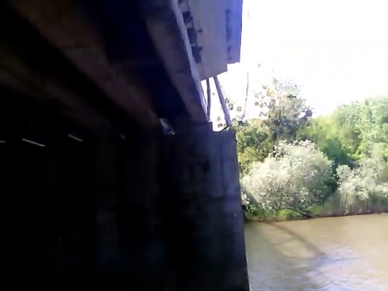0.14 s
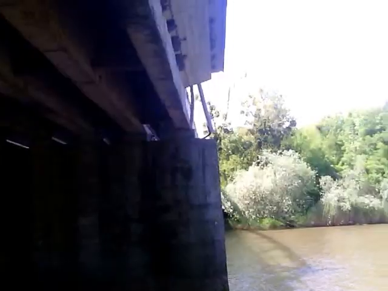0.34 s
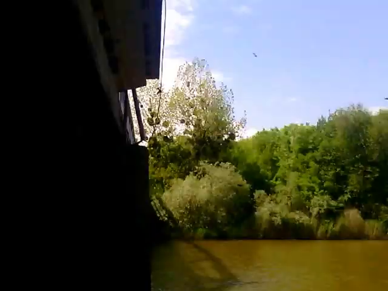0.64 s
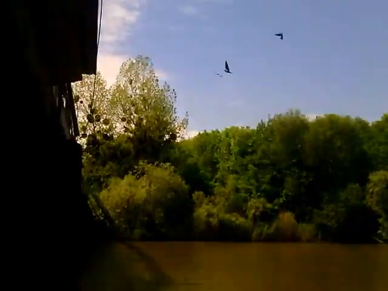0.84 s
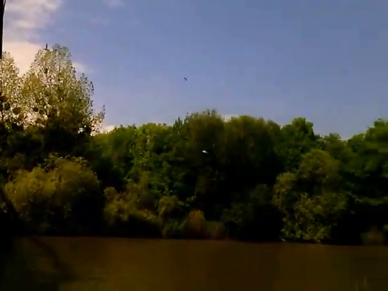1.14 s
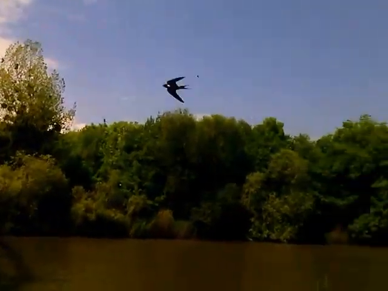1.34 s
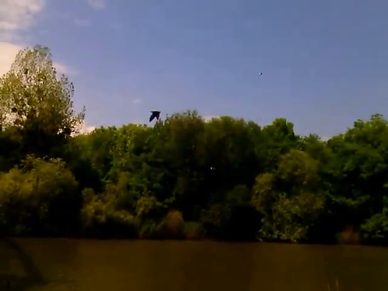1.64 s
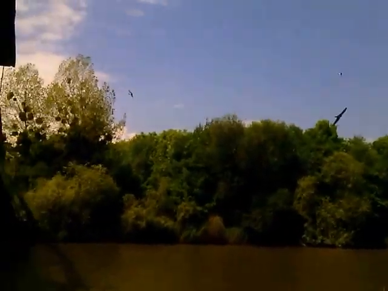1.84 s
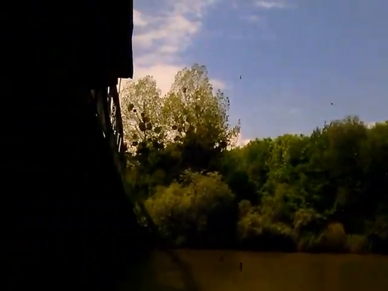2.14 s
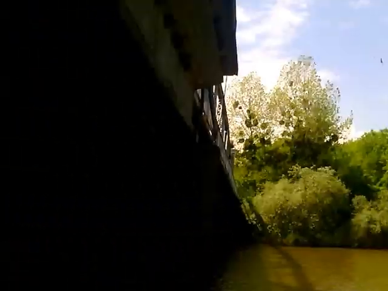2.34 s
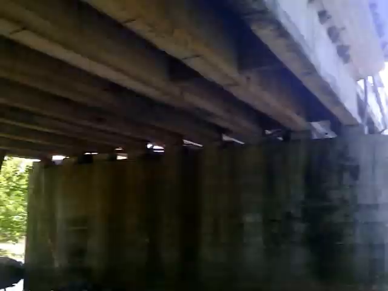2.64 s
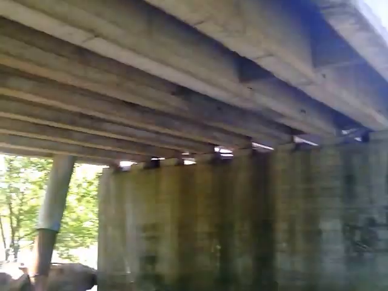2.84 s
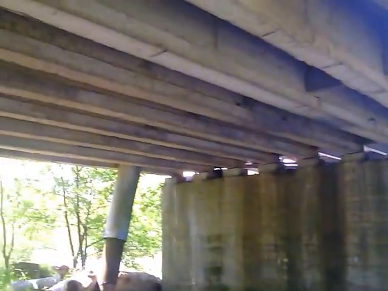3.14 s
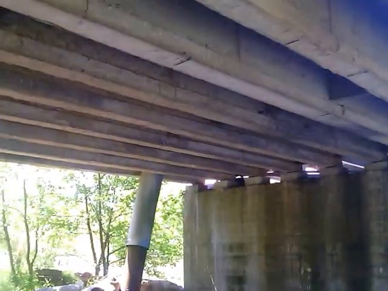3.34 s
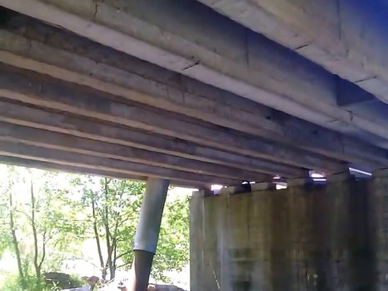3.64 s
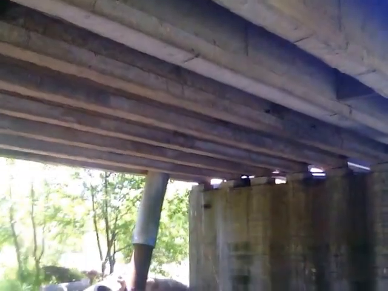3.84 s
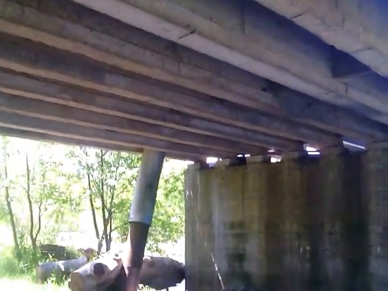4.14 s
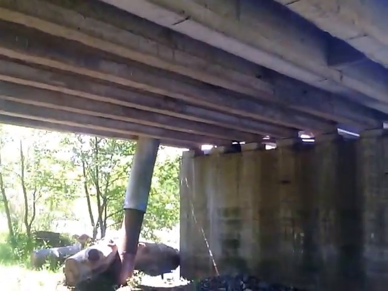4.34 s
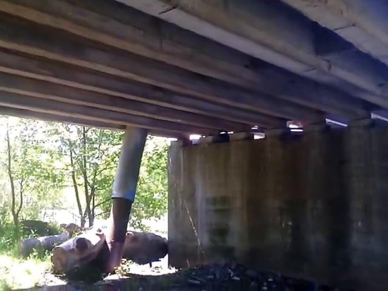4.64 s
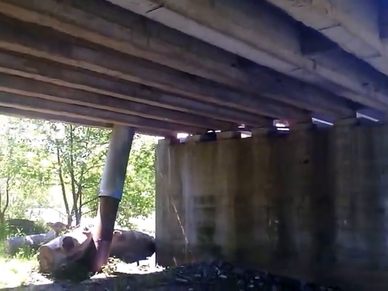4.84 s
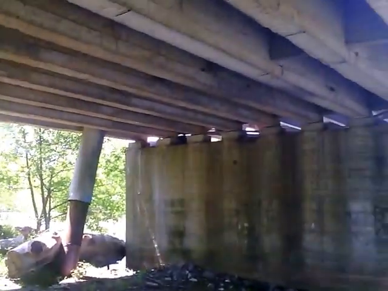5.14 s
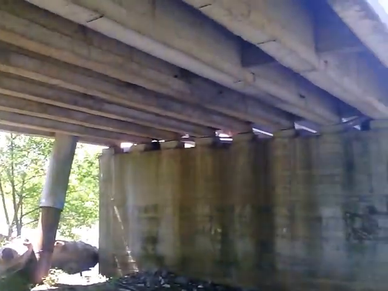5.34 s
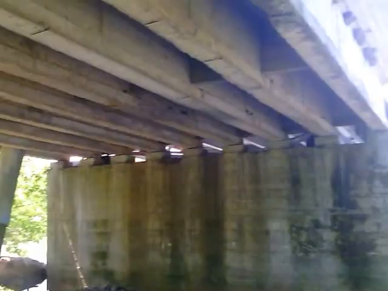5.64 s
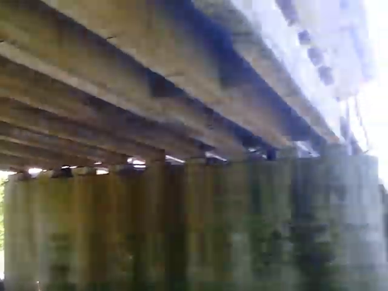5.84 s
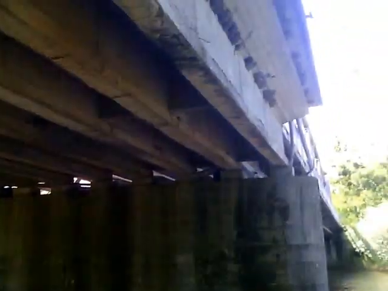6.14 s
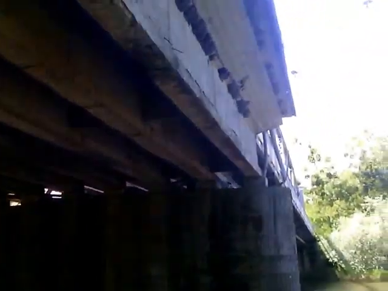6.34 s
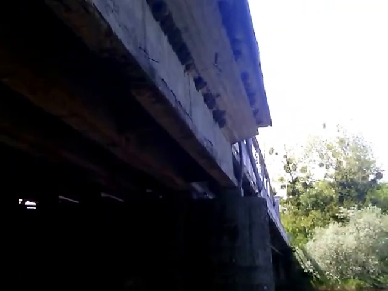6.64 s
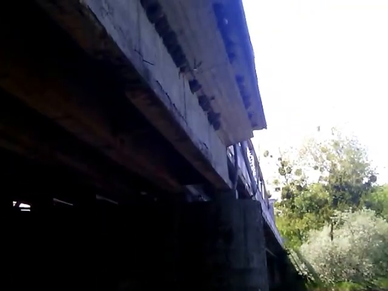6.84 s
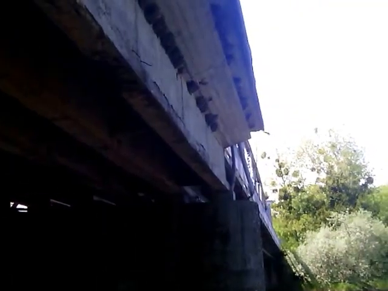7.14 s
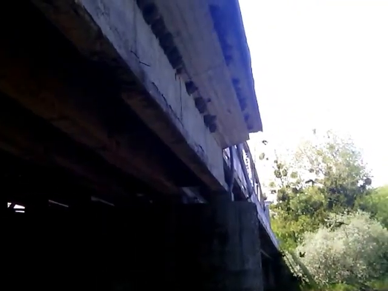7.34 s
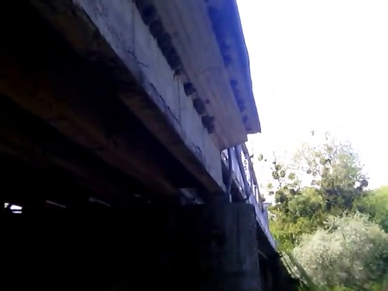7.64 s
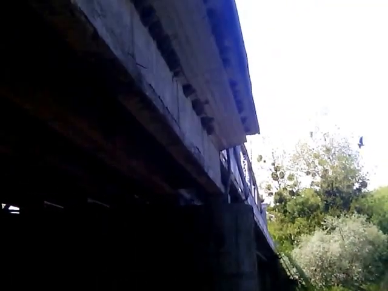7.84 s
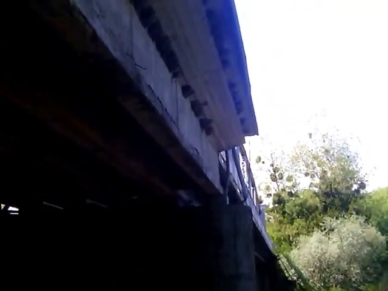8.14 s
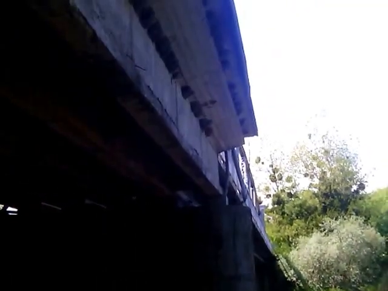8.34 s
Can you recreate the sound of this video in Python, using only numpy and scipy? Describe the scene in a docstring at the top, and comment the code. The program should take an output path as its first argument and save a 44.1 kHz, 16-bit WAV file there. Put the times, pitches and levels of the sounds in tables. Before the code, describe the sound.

Wind buffets a small stereo microphone beneath a bridge by a river, in low lumpy thuds mostly on the right. Swallows call close by with high whistles, buzzy chatter, tumbling runs and rising chirps, echoing off concrete. The background colony swells after the middle, while soft pure bird pipes come from farther off late on. Hard crackling casing creaks snap four times over quiet hiss.

```python
"""Swallows under a road bridge

A swallow colony twitters under concrete: arched screams, falling slides, tumbling runs, rising chirps and raspy
chatter are gliding sine tones, echoed by the bridge. Far birds on the river bank pipe pure tones.
Wind is shaped noise and single pushes at two microphone ports; a plastic casing creaks as decaying rings.
The left port hears the birds more dully and later, and less of the gusts and creaks; a steady hiss lies below."""
import sys
import numpy as np
from scipy import signal
from scipy.fft import rfft, irfft, next_fast_len
from scipy.io import wavfile
from scipy.ndimage import uniform_filter1d, map_coordinates

SR = 44100
rng = np.random.default_rng(int(sys.argv[2]) if len(sys.argv) > 2 else 0)


def dump(signal):
    """Clip the signal to [-1, 1] and save it as 16-bit WAV at the path in sys.argv[1]."""
    limited = np.clip(np.atleast_2d(signal).T, -1, 1)
    pcm = np.round(limited * 32767).astype(np.int16)
    wavfile.write(sys.argv[1], SR, pcm)


N = 373968  # length in samples

# Syllable shapes, how one note glides and swells: share of its length [0 to 1], pitch ratio, level/dB
SLIDE_SHAPE = [(0, 1, -4), (.2, .9, 0), (.5, .73, 0), (1, .56, -4)]
RISE_SHAPE = [(0, .74, 0.98), (.45, .84, 10.6), (.82, .97, 12), (1, 0.98, 20)]
HOOK_SHAPE = [(0, .82, -6), (.4, .93, -2), (.7, 1, 1.5), (1, .98, -2)]


def amp(db):
    """Turn decibels into a gain."""
    return 10 ** (np.asarray(db) / 20)


def unit(x):
    """Scale to an rms (average strength) of 1."""
    return x / np.sqrt(np.mean(x ** 2) + 1e-20)


def along(points, hz):
    """Read (f/Hz, value) points on a logarithmic frequency axis, as hearing spaces pitch."""
    f, value = np.transpose(points)
    return np.interp(np.log(hz + 1), np.log(f), value)


def level_curve(points):
    """Join (t/s, level/dB) points by straight lines, one level per sample."""
    s, db = np.transpose(points)
    return np.interp(np.arange(N) / SR, s, db)


def wobble(rate, size=N):
    """A smooth random curve with `rate` random knots a second."""
    knots = rng.standard_normal(int(size * rate / SR) + 4)
    return map_coordinates(knots, [np.arange(size) * rate / SR], order=2)


def filtered(x, response):
    """Multiply the spectrum of x by a function of frequency."""
    size = next_fast_len(N + 8192)
    hz = np.fft.rfftfreq(size, 1 / SR)
    return irfft(rfft(x, size) * response(hz), size)[..., :N]


def coloured(x, spectrum):
    """Boost and cut x by (f/Hz, level/dB) points."""
    return filtered(x, lambda hz: amp(along(spectrum, hz)))


def noise(spectrum):
    """Coloured noise of rms 1, unrelated at the two ports."""
    return unit(coloured(rng.standard_normal((2, N)), spectrum))


def add(track, s, sound):
    """Mix a sound into the track at time s in seconds."""
    start = max(0, min(N, round(s * SR)))
    track[..., start:start + sound.shape[-1]] += sound[..., :N - start]


def lagged(pair, lag_s):
    """Turning the phase in step with frequency makes the left port hear later than the right."""
    left = filtered(pair[0], lambda hz: np.exp(-2j * np.pi * hz * lag_s))
    return np.array([left, pair[1]])


def bridge(sound, beams_db, tail_db, pier=0, spread_s=.035, count=14):
    """Direct sound, slaps off the beams, perhaps one off the pier, and a diffuse tail, new for each call."""
    # time for the tail to die away by 60 dB under the deck: f/Hz, t60/s
    deck_decay = [(1000, 0.86), (3000, 0.85), (5500, 0.46), (10000, 0.29)]
    hz, t, grains = signal.stft(rng.standard_normal((2, SR * 2 // 3)), SR, nperseg=256)
    build_up = 1 - np.exp(-t / 0.0052)
    decay = amp(-60 * t / along(deck_decay, hz)[:, None])
    tail = signal.istft(grains * decay * build_up, SR, nperseg=256)[1]
    response = amp(tail_db) * tail / np.linalg.norm(tail[0])
    for port in response:
        slap_at = (SR * (.004 + spread_s * rng.random(count))).astype(int)
        port[slap_at] += amp(beams_db) * rng.standard_normal(count) / np.sqrt(count)
    response[:, 0] += 1  # the direct sound
    response[:, int(.022 * SR)] += pier  # 22 ms behind it
    return signal.fftconvolve(sound[None], response / np.linalg.norm(response[0]), axes=1)


def syllable(shape, length_s, hz, rough, overtone_db=-32, buzz=0, flicker_db=3):
    """A gliding whistle trembles in pitch and strength; a slower second vibration adds buzzy sidebands."""
    size = int(length_s * SR)
    u = np.linspace(0, 1, size)
    share, ratio, db = np.transpose(shape)
    glide = uniform_filter1d(np.interp(u, share, ratio), size // 12)
    pitch_hz = hz * glide * (1 + rough * wobble(600, size))
    phase = 2 * np.pi * np.cumsum(pitch_hz) / SR
    second_hz = 950 * rng.uniform(.8, 1.3) * glide * (1 + .02 * wobble(300, size))
    phase = phase + buzz * np.sin(2 * np.pi * np.cumsum(second_hz) / SR)
    swell = amp(np.interp(u, share, db) + flicker_db * wobble(233, size))
    swell = swell * signal.windows.tukey(size, .1)  # soft ends
    return np.sqrt(2) * swell * (np.sin(phase) + amp(overtone_db) * np.sin(2 * phase))


def rattled(call, depth_db):
    """A harsh note comes in quick uneven pulses, around 170 a second."""
    pulse_hz = 170 * rng.uniform(.7, 1.3) * (1 + .2 * wobble(100, len(call)))
    turns = np.cumsum(pulse_hz) / SR
    return call * unit(amp(depth_db * np.cos(2 * np.pi * turns)))


def screams():
    """Arched whistles rise, then drop, with an added slap off the pier."""
    # syllable shape: share of the length [0 to 1], pitch ratio, level/dB
    arch_shape = [(0, .88, -2), (.09, .98, 0), (.4, 1, 1.5), (.6, 1.01, 2.5), (.74, .95, 2), (.87, .81, 0),
                  (1, .63, -6)]
    # each scream: t/s, f/Hz that the shape multiplies, level/dB that the shape adds to
    scream_list = [(1.672, 5320, -28), (2.282, 5620, -26), (3.126, 5425, -25.5), (3.68, 5280, -28.5),
                   (3.833, 5584, -26), (4.717, 5370, -26), (4.877, 5534, -24), (5.17, 5655, -23),
                   (6.364, 5495, -24.5), (6.715, 5555, -22.5)]
    out = np.zeros((2, N))
    for s, hz, db in scream_list:
        call = syllable(arch_shape, .095, hz, rough=.007, overtone_db=-35, flicker_db=1.5)
        add(out, s, amp(db) * bridge(call, beams_db=-2, tail_db=0, pier=.5))
    return out


def slides():
    """Short falling whistles with a buzzy edge."""
    # each slide: t/s, length/s, top f/Hz, level/dB that the shape adds to
    slide_list = [(2.214, 0.019, 6360, -27), (3.04, 0.038, 5990, -33.5), (3.739, 0.027, 5360, -34.5),
                  (4.803, 0.023, 5660, -33), (5.081, 0.026, 5690, -30.5), (6.3, 0.03, 5630, -31.5)]
    out = np.zeros((2, N))
    for s, length_s, hz, db in slide_list:
        call = syllable(SLIDE_SHAPE, length_s, hz, rough=.05, buzz=.5)
        add(out, s, amp(db) * bridge(call, beams_db=4, tail_db=4))
    return out


def tumble(top_hz, count=6):
    """Short notes in quick succession, each lower than the last by a shrinking step."""
    # syllable shape: share of the length [0 to 1], pitch ratio, level/dB
    dip_shape = [(0, 1.09, -5), (.5, .97, 2), (1, 1.03, -8)]
    step_s, step_shrink = .0215, .79
    bottom_share = .35  # of the top pitch, which the notes sink towards
    call = np.zeros(int((count + 1) * step_s * SR))
    for k in range(count):
        hz = top_hz * (bottom_share + (1 - bottom_share) * step_shrink ** k)
        note = syllable(dip_shape, step_s, hz, rough=.028, flicker_db=2)
        add(call, k * step_s, amp(-.6 * (k - 2) ** 2) * note)  # the third note is loudest
    return call


def tumbles():
    """Tumbling runs echo between the beams."""
    # each run: t/s, f/Hz that the first note's shape multiplies, level/dB that the shape adds to
    tumble_list = [(0.46, 6360, -44.5), (0.673, 6700, -41.5), (1.006, 6640, -41.5), (7.09, 6800, -30.5),
                   (7.121, 6080, -34)]
    out = np.zeros((2, N))
    for s, hz, db in tumble_list:
        add(out, s, amp(db) * bridge(tumble(hz), beams_db=-2, tail_db=-4))
    return out


def chirps():
    """Short rising whistles grow louder as they climb."""
    # each chirp: t/s, f/Hz that the shape multiplies, level/dB that the shape adds to
    chirp_list = [(2.078, 5250, -53), (3.394, 6400, -56), (3.416, 3686, -52), (4.038, 3570, -49),
                  (4.198, 4800, -50), (4.585, 4600, -52), (4.735, 3010, -52.5), (5.003, 4096, -45),
                  (5.44, 3110, -55), (6.112, 6900, -49), (6.579, 4840, -41), (6.946, 4810, -42),
                  (7.583, 4650, -42), (8.006, 4500, -40)]
    out = np.zeros((2, N))
    for s, hz, db in chirp_list:
        call = syllable(RISE_SHAPE, .04, hz, rough=.028, overtone_db=-19)
        add(out, s, amp(db) * bridge(call, beams_db=-1, tail_db=-3))
    return out


def chatter():
    """Raspy notes combine a rough pitch, a buzzing second vibration and quick pulses."""
    # each raspy note: t/s, length/s, f/Hz that the shape multiplies, level/dB that the shape adds to
    rasp_list = [(.005, 0.059, 5320, -40.5), (0.098, 0.052, 5350, -46.5), (0.573, 0.056, 4600, -36.5),
                 (1.48, 0.01, 5340, -39.5), (1.508, 0.0093, 4970, -34), (1.534, 0.015, 4940, -44),
                 (3.508, .04, 4840, -37), (3.589, 0.036, 6400, -38.5), (3.721, 0.037, 4530, -31),
                 (4.402, 0.041, 4940, -34.5), (4.479, 0.025, 6940, -32.5), (5.716, 0.045, 4580, -31.5),
                 (5.84, 0.036, 4850, -28.5), (5.986, 0.036, 4760, -28.5), (6.167, 0.04, 4534, -30.5),
                 (6.616, 0.043, 5050, -30), (7.241, 0.032, 6170, -36), (7.402, .03, 4460, -39),
                 (7.489, 0.078, 4510, -36.5), (7.68, 0.043, 4620, -34), (7.802, .045, 4860, -35.5),
                 (8.035, 0.038, 6580, -36), (8.187, 0.05, 5120, -29.5)]
    out = np.zeros((2, N))
    for s, length_s, hz, db in rasp_list:
        call = syllable(HOOK_SHAPE, length_s, hz, rough=.055, overtone_db=-15, buzz=.85, flicker_db=2)
        add(out, s, amp(db) * bridge(rattled(call, depth_db=6), beams_db=-1, tail_db=-3))
    return out


def duets():
    """Two-voiced notes sound one pitch from each side of the syrinx, the bird's voice organ."""
    # syllable shape: share of the length [0 to 1], pitch ratio, level/dB
    level_shape = [(0, .94, -2.5), (.3, .995, 3), (.7, 1.015, 1), (1, .99, -7)]
    # each note: t/s, length/s, lower f/Hz and upper f/Hz that the shape multiplies, level/dB that it adds to
    duet_list = [(1.345, 0.035, 3560, 3650, -52), (1.582, 0.073, 3795, 4004, -40),
                 (1.884, 0.05, 5030, 5700, -39.5), (2.143, 0.031, 4850, 5980, -37.5),
                 (2.532, 0.05, 5040, 5900, -33.5), (2.583, 0.06, 5120, 6150, -39),
                 (2.67, 0.051, 4560, 5730, -34), (4.282, 0.023, 3733, 5200, -41),
                 (4.43, 0.043, 5090, 5200, -42), (4.62, .06, 5300, 6880, -41),
                 (5.614, 0.025, 5050, 6060, -41.5), (5.856, .038, 3610, 4960, -40),
                 (5.997, 0.03, 3690, 4830, -37), (6.233, 0.024, 5770, 6200, -35),
                 (7.805, 0.052, 3390, 5260, -40.5), (7.913, 0.057, 4600, 5880, -40),
                 (7.989, 0.034, 5510, 6430, -35), (8.11, 0.0505, 5315, 5610, -32.5),
                 (8.305, 0.061, 4630, 5280, -35.5), (8.348, 0.042, 4810, 6410, -35),
                 (8.406, 0.048, 4780, 5230, -37)]
    out = np.zeros((2, N))
    for s, length_s, low_hz, high_hz, db in duet_list:
        low = syllable(level_shape, length_s, low_hz, rough=.02, overtone_db=-15)
        high = syllable(level_shape, length_s, high_hz, rough=.02)
        call = rattled(low + amp(-1) * high, depth_db=2.5)
        add(out, s, amp(db) * bridge(call, beams_db=-1, tail_db=-4))
    return out


def swallows():
    """The near birds call on the wing and from their nests, all kinds of call added up."""
    return screams() + slides() + tumbles() + chirps() + chatter() + duets()


def colony(count=800, groups=10):
    """Many farther birds in groups of nests overlap their gritty syllables in a running twitter."""
    # loudness of the birds deep under the deck: t/s, level/dB
    colony_level = [(0, -60), (2.9, -49.5), (3.7, -48), (4.7, -39.5), (5.5, -43), (6.1, -39.5), (7.3, -42),
                    (8.48, -40.5)]
    # filter for their twitter: f/Hz, level/dB, before scaling to rms 1
    colony_colour = [(700, -5), (1500, -17), (2300, -14), (3500, -3.5), (4800, -1), (7000, 3),
                     (10000, -1.5), (13000, -40)]
    nests = np.zeros((groups, N))
    for i, (when, length, pitch, loudness) in enumerate(rng.random((count, 4))):
        shape = (RISE_SHAPE, SLIDE_SHAPE, HOOK_SHAPE)[i % 3]
        hz = 2400 * 2.7 ** pitch
        call = syllable(shape, .02 + .04 * length, hz, rough=.035, overtone_db=-8, buzz=.7)
        start_s = (i + when) / count * N / SR
        add(nests[i % groups], start_s, amp(5 * loudness) * unit(rattled(call, depth_db=6)))
    echoed = sum(bridge(calls, beams_db=4, tail_db=3) for calls in nests)
    return amp(level_curve(colony_level)) * unit(coloured(echoed, colony_colour))


def bank_birds():
    """Pure distant pipes waver a little in strength, with a soft echo."""
    # each pipe: t/s, length/s, start f/Hz, end f/Hz, level/dB before the waver
    pipe_list = [(5.955, 0.16, 1163, 1170, -41), (6.776, 0.15, 1168, 1169, -42),
                 (7.432, 0.09, 1884, 1947, -33.5), (7.498, 0.033, 1920, 2033, -31.5),
                 (7.529, 0.2, 1952, 2035, -46)]
    out = np.zeros((2, N))
    for s, length_s, start_hz, end_hz, db in pipe_list:
        size = int(length_s * SR)
        phase = 2 * np.pi * np.cumsum(np.linspace(start_hz, end_hz, size)) / SR
        pipe = np.sin(phase) * signal.windows.tukey(size, .7)
        pipe = pipe * amp(2.6 * wobble(60, size))
        add(out, s, amp(db) * bridge(pipe, beams_db=-14, tail_db=-14))
    return out


def gusts():
    """Each side gust swells quickly, holds and dies away; the strongest counts at every sample."""
    # gusts from the right: t/s when the hold starts, hold/s, level/dB
    gust_list = [(0.034, 0.079, -41), (0.783, 0.047, -42.5), (1.19, .25, -38.5), (1.46, 0.022, -25.5),
                 (1.55, 0.25, -26.5), (1.908, 0.51, -35), (2.411, 0.13, -37.5), (4.466, 0.36, -45.5),
                 (6.572, 0.021, -38.5), (7.285, 0.11, -33), (7.489, 0.23, -36.5)]
    rise_db_per_s, fall_db_per_s = 257, 225
    t = np.arange(N) / SR
    swells = []
    for s, hold_s, db in gust_list:
        before, after = np.maximum(s - t, 0), np.maximum(t - s - hold_s, 0)
        swells.append(db - rise_db_per_s * before - fall_db_per_s * after)
    return amp(np.max(swells, axis=0))


def buffeting(breeze_db, sideways):
    """Eddies push on each port on its own, as lumpy low noise; the left port is in the lee of side gusts."""
    # colour of the buffeting: f/Hz, level/dB, before scaling to rms 1
    buffet_colour = [(30, -50), (50, -4), (95, 1), (140, -5.5), (220, -18.5), (400, -35), (1000, -59)]
    lumps = amp(2.8 * np.array([wobble(35), wobble(35)]))
    buffet = amp(breeze_db + 3) * unit(lumps * noise(buffet_colour))
    buffet[0] *= amp(-2 - 14 * sideways)  # dB lost in a breeze, dB more in a gust
    return buffet


def fluttering(breeze_db, gust, sideways):
    """Side gusts break into thick random eddies, and strong ones tear into quick brighter bursts."""
    # colour of the flutter: f/Hz, level/dB, before scaling to rms 1
    flutter_colour = [(90, -5.5), (200, 7.5), (330, -0.5), (520, -10.5), (800, -26.5), (1300, -35),
                      (2500, -39), (5000, -77)]
    # colour of the bursts: f/Hz, level/dB, before their swings and scaling to rms 1
    tatter_colour = [(150, -23), (430, 1.5), (750, -8.5), (1300, -21.5), (3000, -55)]
    eddies_per_s = 750  # on average
    eddies = (rng.random((2, N)) < eddies_per_s / SR) * rng.standard_normal((2, N))
    gust_part = gust * amp(2.5 * wobble(60))
    breeze_part = amp(breeze_db - 19.5 + 5.8 * wobble(22))
    flutter = (gust_part + breeze_part) * unit(coloured(eddies, flutter_colour))
    bursts = unit(amp(7 * wobble(110)) * noise(tatter_colour))
    return flutter + amp(-9) * gust * sideways * bursts


def puffs():
    """Single eddies hit a port as one smooth push and pull, small ones higher in pitch."""
    # each puff: t/s, centre f/Hz, peak level/dB at the right port
    puff_list = [(0.899, 215, -26.5), (1.187, 101, -17.5), (1.25, 320, -26.5), (1.361, 463, -26.5),
                 (1.376, 294, -19.5), (1.468, 260, -23), (1.479, 230, -17), (1.56, 467, -23),
                 (1.577, 300, -16.5), (1.637, 260, -16.5), (1.647, 330, -18.5), (1.656, 550, -21),
                 (1.717, 360, -19.5), (1.765, 450, -28), (1.779, 390, -20), (1.807, 170, -16),
                 (1.82, 141, -15), (1.845, 99, -11.5), (1.883, 466, -30), (2.036, 303, -20),
                 (2.136, 220, -19), (2.325, 296, -14), (3.528, 234.5, -32.5), (3.79, 216, -26.5),
                 (4.029, 276, -29), (4.311, 310, -20.5), (4.503, 244, -20), (6.587, 231.7, -24),
                 (6.951, 286, -29.5), (7.196, 112, -22), (7.248, 425, -27), (7.298, 330, -13.5),
                 (7.324, 569, -27), (7.358, 129, -15), (7.385, 248, -20), (7.402, 141, -15.5),
                 (7.713, 244, -23), (8.264, 230, -28)]
    out = np.zeros((2, N))
    t = np.arange(-SR // 100, SR // 100) / SR
    for s, hz, db in puff_list:
        u = 2 * np.pi * hz * t
        add(out, s + t[0], amp(db) * u * np.exp((1 - u * u) / 2))
    return out


def wind():
    """A breeze buffets both ports; flutter and puffs strike mainly the windward right port."""
    # strength of the breeze: t/s, level/dB
    breeze_level = [(0.06, -37), (0.27, -57), (0.62, -54.5), (0.88, -39.5), (1.8, -29), (1.9, -37.5),
                    (2.1, -31.5), (2.75, -45.5), (3.0, -35), (3.8, -31), (4.15, -37.5), (4.55, -34.5),
                    (5.35, -42), (5.6, -47.5), (5.9, -44), (6.1, -37), (7.0, -42), (7.35, -36.5),
                    (7.9, -44.5), (8.3, -35.5), (8.48, -38.5)]
    breeze_db = level_curve(breeze_level)
    gust = gusts()
    sideways = gust / (gust + amp(-27))  # near 0 in a light breeze, towards 1 in a gust
    flutter = fluttering(breeze_db, gust, sideways) + puffs()
    return buffeting(breeze_db, sideways) + flutter * amp([[-24], [0]])


def slips(s, db, gap_s, length_s):
    """A run of stick-slip clicks at slightly uneven gaps weakens fast, then slowly: rows (t/s, level/dB)."""
    k = np.arange(round(length_s / gap_s) + 1)
    uneven = .05 * np.sqrt(k) * rng.standard_normal(len(k))
    return list(zip(s + gap_s * (k + uneven), db - 5 * np.log2(1 + k)))


def casing():
    """The plastic shell gives and springs back; each slip rings it by the right port, faint and dull at left."""
    # creaks, in pairs for give and spring-back: t/s, level/dB of the first slip, gap between slips/s, length/s
    creak_list = [(1.922, -13, 0.0078, .015), (1.954, -8.5, 0.0042, .018), (3.952, -8, 0.007, .027),
                  (3.9848, -7.5, 0.0029, .008), (6.922, -21, 0.0053, .01), (6.946, -22.5, 0.003, .004),
                  (7.7518, -14, 0.0071, .015), (7.7834, -8.5, 0.004, .017)]
    # ringing tones of the shell: average f/Hz, level/dB against the slip, t60/s (time to fall by 60 dB)
    shell_tones = [(1620, -65, 0.011), (2890, -21, 0.017), (5030, 8, 0.0011), (7600, 4.5, 0.0019),
                   (7600, -23, 0.028), (9270, -21, 0.01)]
    out, t = np.zeros((2, N)), np.arange(SR // 30) / SR
    clicks = [click for creak in creak_list for click in slips(*creak)]
    for s, db in clicks:
        pitches = rng.normal(1, 0.066, len(shell_tones))  # each slip rings slightly differently
        ring = np.zeros(len(t))
        for (hz, level_db, t60), pitch in zip(shell_tones, pitches):
            ring += amp(level_db - 60 * t / t60) * np.sin(2 * np.pi * hz * pitch * t)
        crack = .7 * amp(-60 * t / .003) * rng.standard_normal((2, len(t)))
        rattle = .06 * amp(-60 * t / .035) * rng.standard_normal((2, len(t)))
        attack = 1 - np.exp(-t / 0.000096)
        add(out, s, amp(db) * attack * (ring + crack + rattle))
    left = coloured(out[0], [(2500, -7.0), (5000, -13), (8000, -27)])
    right = coloured(out[1], [(300, -68), (1200, 0.0), (11500, 10.5), (14000, -23)])
    return np.array([left, right])


def hiss():
    """River and microphone hiss is steady coloured noise."""
    # colour of the hiss: f/Hz, level/dB, before scaling to rms 1
    air_colour = [(40, -0.5), (150, -12.5), (420, -13), (800, -17.5), (1500, -18.5), (13000, -18.5),
                  (15500, -21.5)]
    return amp(-50.0) * noise(air_colour)


def scene():
    """Birds reach two unlike ports at slightly different times, with wind, clicks and hiss added."""
    # how the left port hears the swallows against the right one: f/Hz, level/dB
    left_colour = [(1000, 10.5), (2000, 7), (3200, -5.5), (5000, -15), (8000, -28), (12000, -61)]
    left, right = swallows() + colony()
    near = lagged([coloured(left, left_colour), right], lag_s=0.00034)
    far = lagged(bank_birds(), lag_s=0.00019)
    return near + far + wind() + casing() + hiss()


def record(dry):
    """The sound clips at full scale, then loses everything from the band limit of 15.7 kHz up."""
    return filtered(np.clip(dry, -1, 1), lambda hz: hz < 15700)


dry = scene()
out = record(dry)
dump(out)
```